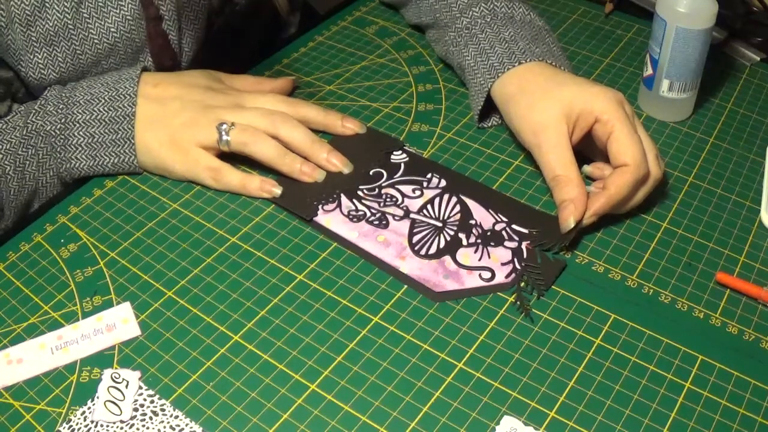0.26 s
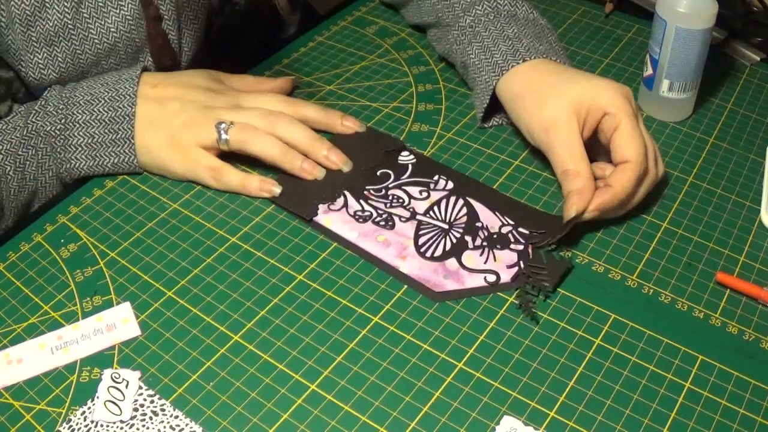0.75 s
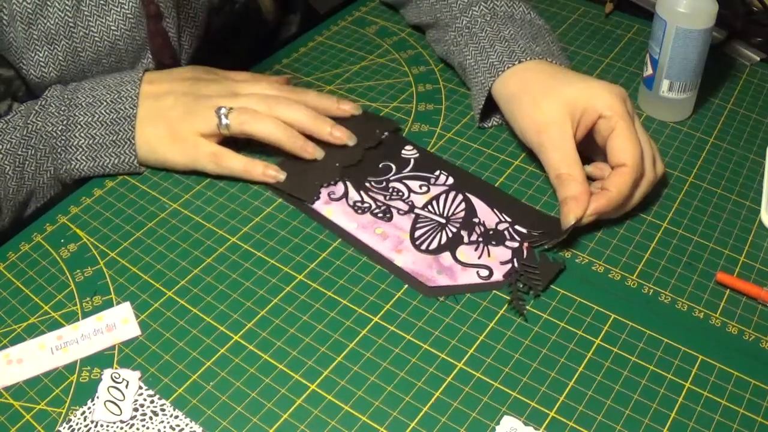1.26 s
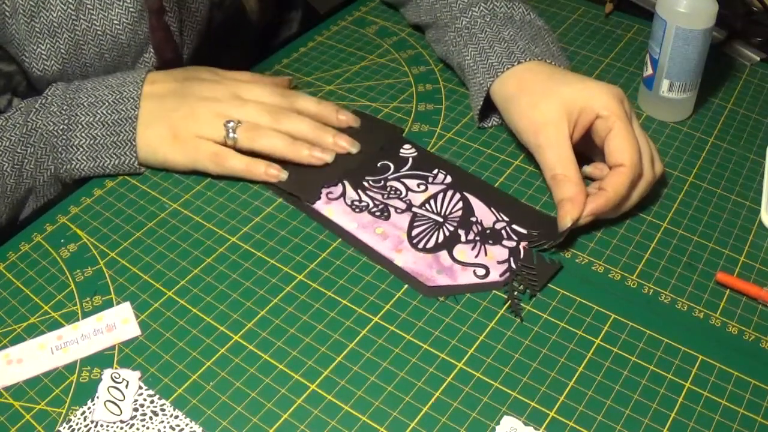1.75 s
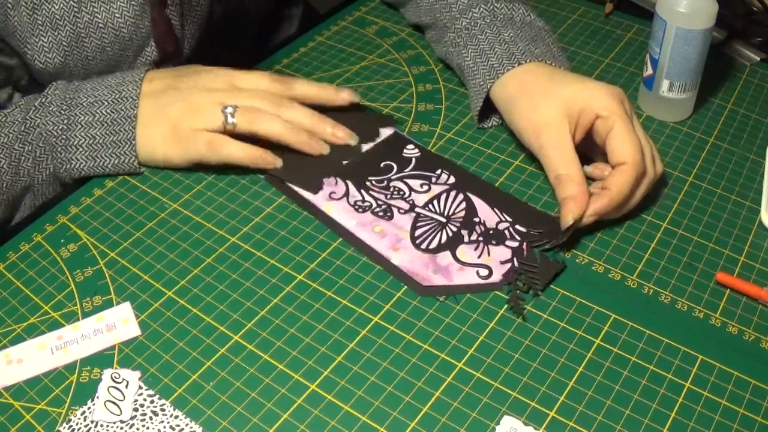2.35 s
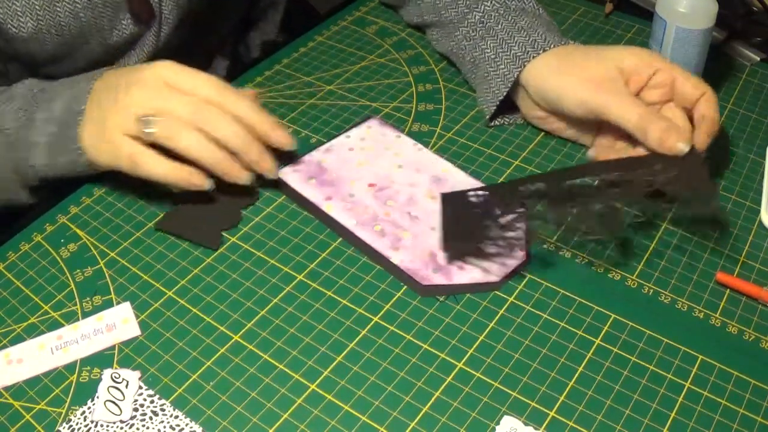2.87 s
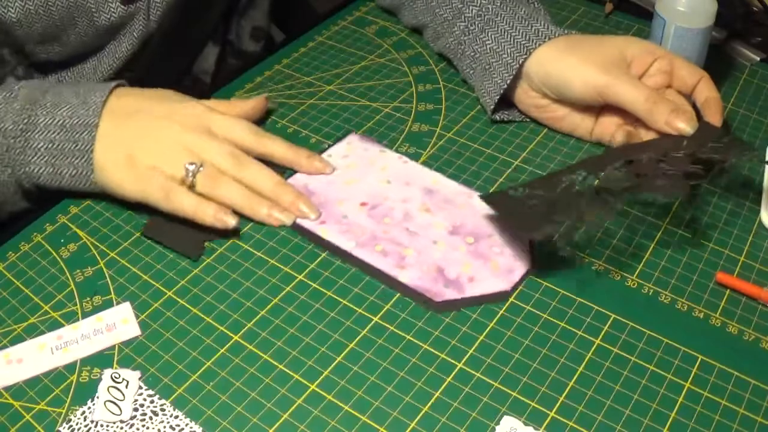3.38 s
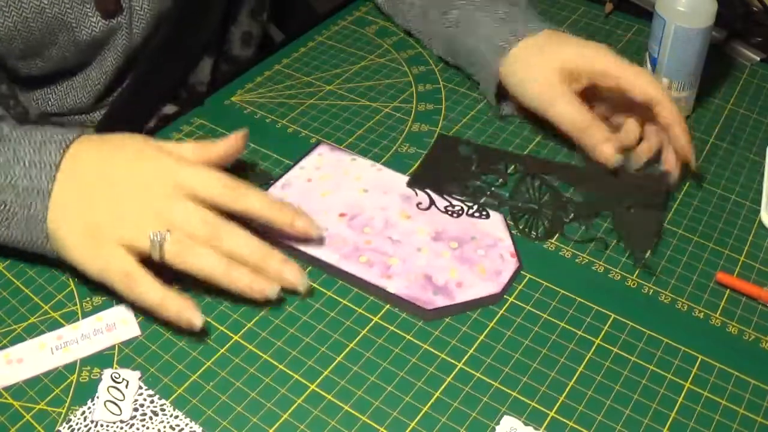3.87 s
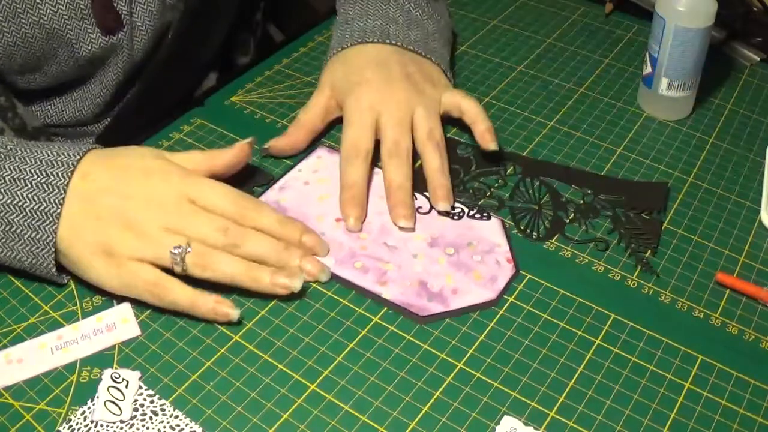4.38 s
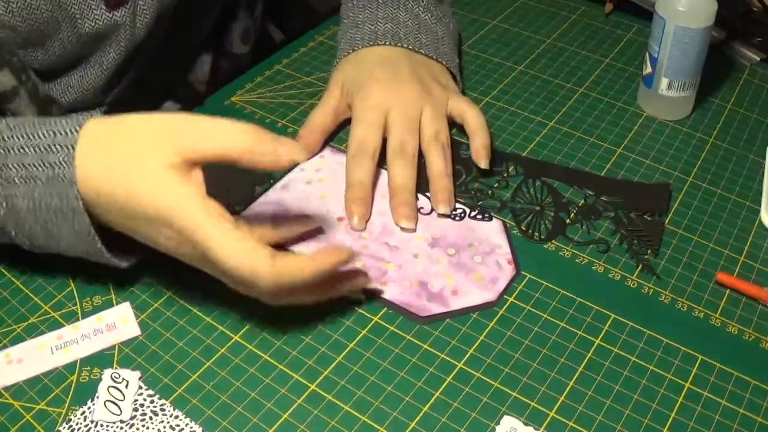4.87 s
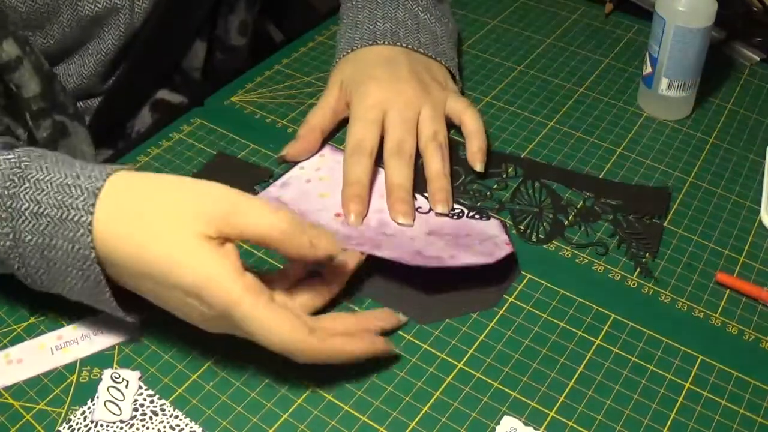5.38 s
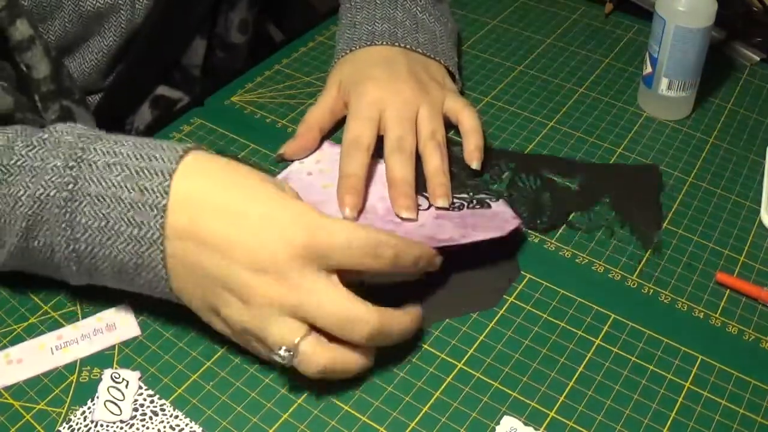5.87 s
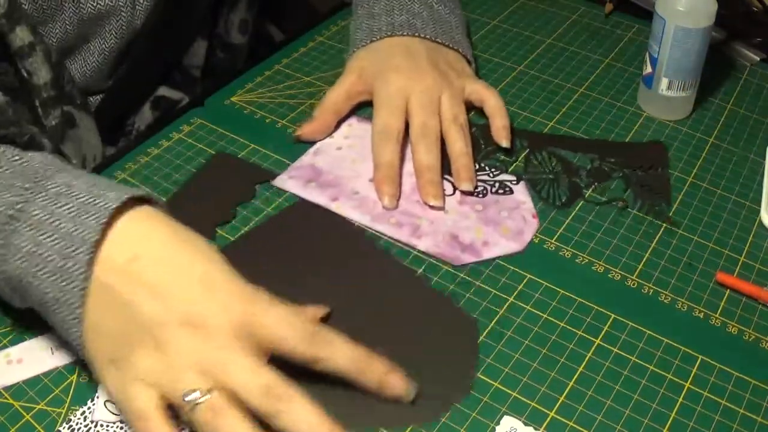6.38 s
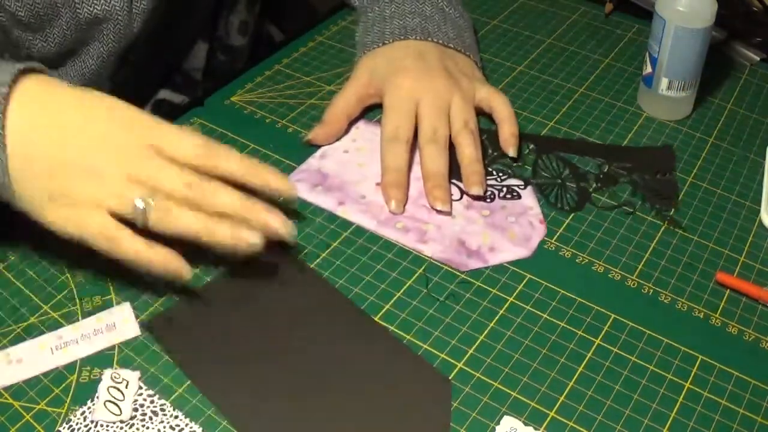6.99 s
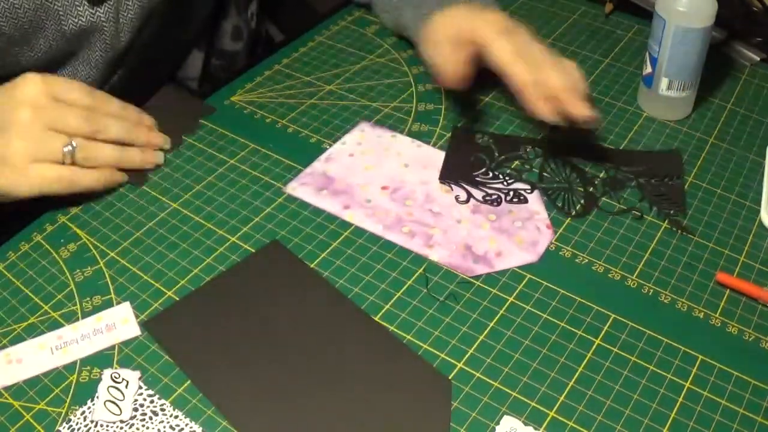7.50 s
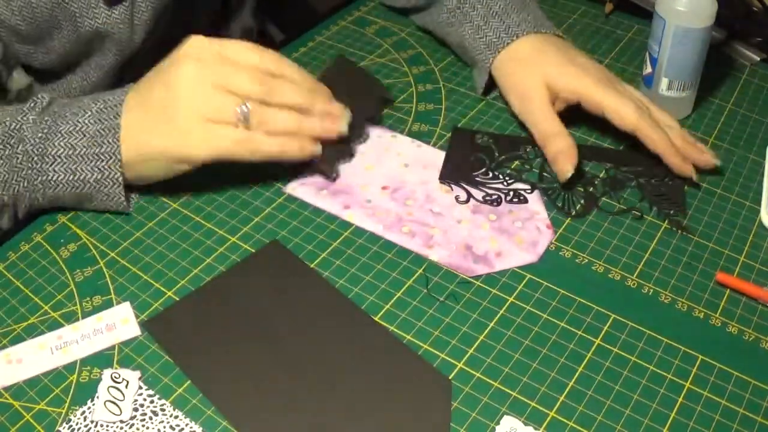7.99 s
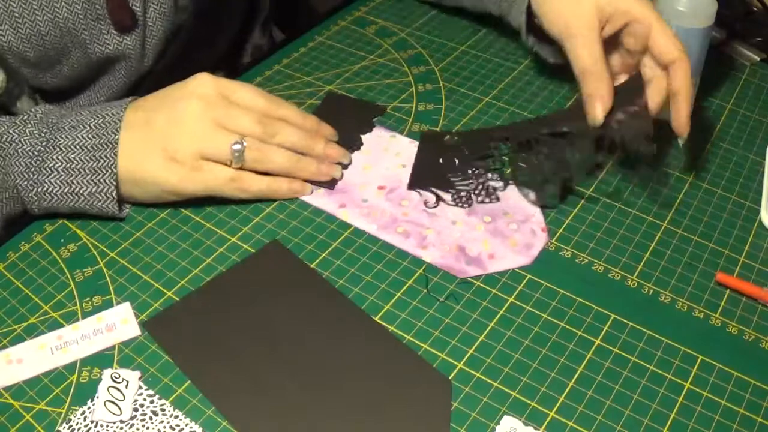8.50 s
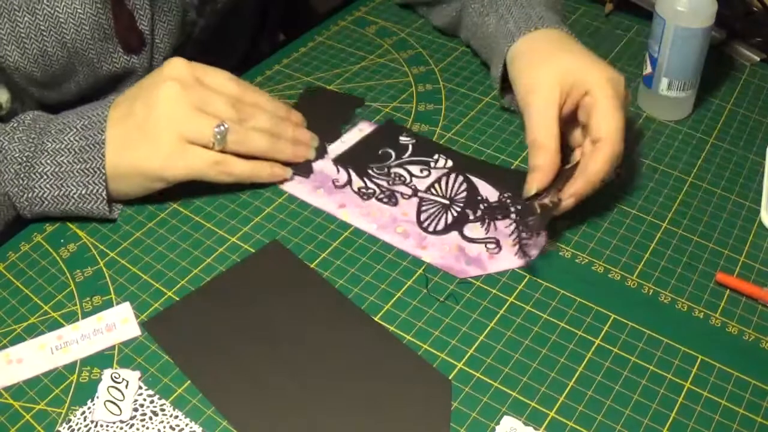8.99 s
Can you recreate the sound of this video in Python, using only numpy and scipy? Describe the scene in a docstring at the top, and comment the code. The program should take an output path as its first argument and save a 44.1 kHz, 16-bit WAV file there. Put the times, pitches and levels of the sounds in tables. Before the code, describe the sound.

Close to a small stereo camera in a quiet, faintly humming room, hands handle card on a cutting mat. Faint scuffs and a few crisp snaps come first, then a strong rustling drag as a lacy strip is pulled off with a wavering papery whine. Smaller scrapes follow, a louder slide near six seconds, and more shuffling, a hard snap and soft rustles to the end. A tiny mechanical tick runs underneath at times.

```python
"""Pieces of card and lacy cut paper are lifted, slid and laid down on a cutting mat, close to a small camera.
Sliding fibres hiss and catch: clumped random clicks over noise, coloured by the sheet and mirrored by the mat.
Card edges snap and fingernails tap as short noise bursts; the lacy strip sings as a wavering, gliding band.
Hand bumps ring low desk modes and a forearm rumbles over the top. Under it lie a quiet room of shaped noise
with mains hum, and a faint, regular ticking of struck modes, perhaps the camera's lens drive."""
import sys
import numpy as np
from scipy import signal
from scipy.fft import rfft, irfft
from scipy.io import wavfile
from scipy.ndimage import map_coordinates

SR = 44100
rng = np.random.default_rng(int(sys.argv[2]) if len(sys.argv) > 2 else 0)


def put_to_file(sound):
    """Save the sound as 16-bit audio at rate SR, in the file named by the first command-line argument."""
    columns = np.atleast_2d(sound).T  # one column per channel
    safe = np.clip(columns, -1, 1)
    whole_steps = np.round(safe * 32767)
    wavfile.write(sys.argv[1], SR, whole_steps.astype(np.int16))


N = 407925
TIME = np.arange(N) / SR  # s
FREQS = np.maximum(np.arange(N // 2 + 1) * SR / N, 1)  # Hz

# Levels of sources are relative, ahead of their trims, sheet ringing and the room.
# strokes of card over card or mat: (time at full speed [s], rise [s], hold [s], fade [s],
# flex [dB], rasp [dB], hiss [dB], ring of the free sheet [Hz], damped if below 100)
STROKES = [(0.594, 0.033, 0.023, 0.13, -75, -63.5, -56.5, 0),
           (0.706, .06, 0.017, 0.058, -80, -66, -59.5, 0), (0.845, 0.095, 0.022, 0.11, -70, -60, -57.5, 0),
           (1.02, 0.13, .04, 0.15, -73, -62, -55, 0), (1.166, 0.05, .1, 0.13, -71, -66.5, -61, 3350),
           (1.513, 0.041, 0.0077, 0.058, -79, -82, -67, 0),
           (1.642, 0.011, 0.059, 0.15, -65, -56.5, -53.5, 6400),
           (1.945, 0.049, 0.0082, 0.039, -71, -56.5, -49.5, 0), (2.15, 0.089, .01, 0.1, -85, -73, -63, 0),
           (2.29, 0.031, 0.023, 0.19, -64, -47.5, -42, 5350),
           (2.43, 0.087, 0.037, .2, -57, -46, -43.5, 5350),
           (2.559, 0.072, 0.14, 0.14, -60.5, -44.5, -42, 3500),
           (2.729, 0.057, 0.012, 0.11, -51, -50, -56, 4100),
           (3.069, 0.13, 0.0088, 0.17, -65, -63.5, -58, 0),
           (3.239, 0.046, 0.023, 0.086, -56.5, -44.5, -41.5, 0),
           (3.481, 0.14, 0.019, 0.17, -60, -49.5, -45.5, 0), (3.69, 0.089, 0.13, .1, -80, -66, -63, 0),
           (3.82, 0.034, .03, 0.44, -66.5, -55, -52.5, 0), (3.976, .2, 0.025, 0.48, -64.5, -64.5, -72, 0),
           (4.33, 0.18, 0.044, 0.033, -91, -71, -63, 0), (4.65, .05, .01, 0.062, -75, -61, -59, 0),
           (4.86, 0.12, 0.014, 0.039, -62.5, -63, -53, 0),
           (5.267, .02, 0.073, 0.088, -64, -60.5, -68, 2510), (5.436, .02, .03, 0.13, -67, -60, -58, 2510),
           (5.6, 0.11, .03, 0.088, -65, -58, -61, 2510),
           (5.687, 0.063, 0.014, 0.05, -57.5, -49.5, -45.5, 2510),
           (5.777, 0.011, 0.017, 0.081, -62, -38.5, -40.5, 3600),
           (5.825, 0.055, 0.015, 0.048, -49.5, -37.5, -39, 2300),
           (5.91, 0.049, 0.022, 0.17, -60.5, -51, -52, 0),
           (5.991, 0.011, 0.019, 0.12, -54.5, -43, -37.5, 1170),
           (6.096, .07, 0.042, 0.31, -59.5, -46.5, -38, 1170), (6.27, 0.11, .02, .3, -71, -57, -39.5, 8550),
           (6.445, 0.23, 0.17, 0.043, -60.5, -56.5, -42.5, 8555),
           (7.122, 0.016, .085, 0.066, -53.5, -46, -43, 3330),
           (7.24, 0.05, 0.054, 0.091, -57.5, -45, -58, 1820),
           (7.297, 0.044, 0.021, .2, -53.5, -48, -40, 3330),
           (7.443, 0.063, 0.031, 0.056, -49.5, -37.5, -38.5, 4070),
           (7.546, 0.019, 0.0085, 0.042, -57, -47, -45.5, 0),
           (7.626, 0.03, 0.0083, 0.053, -54, -48, -48.5, 0),
           (7.785, 0.083, 0.0088, 0.11, -62.5, -54.5, -47, 0), (7.9, 0.13, 0.15, .1, -67.5, -60, -58.5, 0),
           (8.058, .012, 0.037, 0.02, -50.5, -45.5, -41.5, 8900),
           (8.139, .005, 0.033, 0.053, -50.5, -41.5, -40.5, 5103),
           (8.213, 0.046, 0.02, 0.092, -60, -59, -51.5, 0),
           (8.27, .02, 0.041, 0.12, -61.5, -50, -44.5, 4060), (8.416, .05, 0.21, 0.39, -70, -63, -60.5, 0),
           (8.777, 0.018, 0.016, 0.086, -67, -53, -45.5, 0),
           (8.832, .04, 0.0083, 0.057, -59, -55, -59, 4060),
           (8.955, 0.08, .015, 0.088, -56, -48.5, -43.5, 4060), (9.22, .25, .03, .1, -69, -57.5, -55.5, 0)]
# held card never lies quite still: resting level of (flex [dB], rasp [dB], hiss [dB])
RESTING_DB = [-79.5, -80, -71]
# flex, rasp and hiss in turn: (low edge [Hz], high edge [Hz])
RANGES = [(560, 2200), (2200, 6500), (6700, 12500)]
# overall colour of rubbed card: (frequency [Hz], density [dB per Hz])
CARD = [(250, -20.5), (480, -17), (700, -11.5), (1000, -12), (1450, -12), (1800, -11.5), (2500, -8),
        (3600, -3), (5000, -4), (5800, -7.5), (7200, -4), (8700, 2.5), (9700, 2.5), (11000, -5)]
# resonances of card on the mat: (frequency [Hz], width [Hz], boost [dB])
CARD_PEAKS = [(684, 140, -2), (1196, 60, 2), (1810, 93, 3.5), (3450, 400, 2), (4160, 570, 2),
              (4930, 340, 1), (6370, 1200, 1), (7640, 510, 1.5), (8600, 600, 0.5)]
# snaps, taps and short scuffs of card: (time [s], flex [dB], rasp [dB], hiss [dB], length [s],
# ring of the free sheet [Hz], damped if below 100); levels are rms over 10 ms
SNAPS = [(0.3666, -65, -54.5, -51, 0.033, 0), (1.0763, -56.5, -47, -39.5, 0.011, 1450),
         (1.102, -72, -55, -52, .008, 0), (1.134, -63, -54, -48, .008, 0),
         (1.1534, -42.5, -34, -28.5, 0.0094, 1400), (1.2626, -64, -50, -50.5, .012, 0),
         (1.6478, -49.5, -36.5, -39.5, 0.012, 2998), (1.7989, -79, -57, -59, 0.0092, 0),
         (2.3804, -46.5, -47, -58, 0.03, 0), (2.5825, -70, -36, -39, 0.0096, 5353),
         (2.6585, -63, -47, -36.5, .015, -6), (2.733, -41.5, -39.5, -58, 0.015, 0),
         (3.8054, -75, -47, -45, 0.012, 0), (3.8842, -60, -53, -49, 0.0074, 0),
         (4.467, -66, -70, -56, 0.0091, 0), (4.493, -73, -56, -46, 0.043, 0),
         (4.506, -64, -49, -36, 0.012, 0), (4.5333, -64, -47.5, -45.5, .014, 0),
         (5.011, -78, -65, -54, .03, 0), (5.0197, -68, -50.5, -41.5, 0.015, 0),
         (5.055, -64, -54, -49.5, 0.011, 0), (5.179, -55, -66, -71, 0.022, 900),
         (5.249, -68, -57, -51.5, 0.009, 0), (5.371, -50.5, -50, -59, 0.05, 2510),
         (5.913, -62, -58, -33.5, 0.017, 0), (5.963, -52, -46.5, -39, 0.021, 0),
         (6.478, -65, -62, -33.5, .009, 8550), (6.5605, -59, -67, -32.5, 0.0042, 8550),
         (7.2195, -51, -51, -52, 0.034, 1822), (7.4816, -47, -36.5, -34, 0.023, 4070),
         (8.0464, -51, -44.5, -34, 0.013, 0), (8.0926, -36.5, -25, -33, .017, 700),
         (8.0973, -45, -33, -41, 0.0089, 5100), (8.413, -57, -52, -50, 0.025, 0),
         (8.441, -50.5, -48.5, -47, 0.036, 2900), (8.547, -73, -53.5, -52.5, .014, 4),
         (8.793, -58, -55, -38, 0.0094, 7)]
# the lacy strip sings as it is dragged off the card: (time [s], level [dB])
SING = [(2.25, -85), (2.33, -56.5), (2.45, -58), (2.62, -52.5), (2.76, -60), (2.84, -67), (3.15, -70.5),
        (3.35, -83)]
# pitch of that singing: (time [s], frequency [Hz])
SING_HZ = [(2.3, 1980), (2.5, 1900), (2.65, 1760), (2.85, 2060), (3.2, 2080)]
# where the handled card lies: (time [s], left minus right [dB])
PLACE = [(0, -2), (2.7, -1.5), (5.8, -2.2), (6.6, -2), (7.15, 0), (7.5, 0), (8.2, -2.8), (8.8, -2.5)]
# left-right colour of card and ticking: (frequency [Hz], left minus right [dB])
CARD_BALANCE = [(400, -6), (1100, -0.5), (2000, -0.6), (5000, 1.5), (9000, 1.7)]
# soft bumps of a hand on the desk: (time [s], level [dB])
BUMPS = [(3.103, -38), (3.122, -45), (6.966, -48), (8.082, -43), (8.094, -50)]
# desk modes: (frequency [Hz], level [dB], t60 [s])
DESK = [(115, -20, 0.063), (157, -2, 0.058), (207, 0.5, 0.056), (297, -10, 0.044)]
# a forearm shifts on the desk: (time of the middle [s], length [s], level [dB])
ARM_SHIFTS = [(2.794, 0.66, -61), (3.953, 0.37, -60.5), (4.873, 0.35, -62.5), (6.55, 0.98, -59.5),
              (7.597, 0.55, -60.5), (8.2, 0.74, -59), (8.95, .7, -63.5)]
# spells of regular ticking: (start [s], end [s], level [dB])
TICKING = [(2.904, 3.2, -51), (4.105, 7.1, -52.5), (7.703, 9.2, -49.5)]
# single small pings: (time [s], level [dB])
PINGS = [(.935, -37), (.995, -35), (2.835, -38), (2.864, -48), (4.648, -44)]
# modes of ticks and pings: (frequency [Hz], level [dB], t60 [s])
TICK_MODES = [(2960, -9, 0.035), (3350, -6, 0.012), (3300, -11, 0.017)]
# colour of the room noise: (frequency [Hz], density [dB per Hz])
ROOM = [(20, -20), (36, -12), (55, -10), (80, -4), (150, -6.5), (185, -7.5), (247, -4), (400, -11),
        (505, -13.5), (1000, -15.5), (1850, -18), (2900, -22), (6000, -26), (11000, -32)]
# left-right likeness of the room noise: (frequency [Hz], likeness [0-1])
LIKENESS = [(50, 1), (130, 0.9), (260, 0.91), (500, 0.4), (1000, 0.1), (3000, 0.2), (9000, 0.64)]
# hum: (frequency [Hz], rms level [dB], waver [rad of phase; half of it as share of level])
HUM = [(50, -65.5, .18), (150, -69, .35), (246, -66, .75), (404, -74, .4), (851, -85, 1.3)]


def from_db(db):
    """Decibels to gain."""
    return 10 ** (np.asarray(db) / 20)


def rms_one(x):
    """Scale to unit rms."""
    return x / np.sqrt(np.mean(x ** 2) + 1e-20)


def in_time(rows):
    """Each column of a curve, at every sample."""
    s, *columns = np.transpose(rows)
    return [np.interp(TIME, s, column) for column in columns]


def by_frequency(points):
    """A curve over log frequency, at every bin."""
    hz, value = np.transpose(points)
    return np.interp(np.log(FREQS), np.log(hz), value)


def drift(rate):
    """Random wander of unit rms: straight lines between `rate` random points per second."""
    knots = rng.standard_normal(int(N / SR * rate) + 4)
    return rms_one(np.interp(TIME * rate, np.arange(len(knots)), knots))


def causal(gain):
    """Short minimum-phase impulse response with the given gain per bin."""
    cepstrum = irfft(np.log(gain + 1e-5), N)[:4096]
    cepstrum[1:] *= 2  # fold the cepstrum to make it causal
    return irfft(np.exp(rfft(cepstrum)))[:1024]


def convolve(x, response):
    """Pass a sound through an impulse response."""
    return signal.oaconvolve(x, response)[:N]


def sliding(responses, judder_db=0.8, patchy_db=1.06, ring_db=0.0):
    """Each stroke drives the sheet with friction; the grip judders in all ranges at once."""
    grip = judder_db * drift(170)
    rub = friction(catches_per_s=1800, size_db=2.0, smooth_share=0.5) + crackles()
    ranges = []
    for response in responses:
        uneven_db = grip + patchy_db * drift(90)
        ranges.append(convolve(rub * from_db(uneven_db), response))
    ranges = np.array(ranges)
    out = from_db(RESTING_DB) @ ranges
    for s, rise, hold, fade, *levels, hz in STROKES:
        span = slice(max(int((s - 2 * rise) * SR), 0), int((s + hold + 2 * fade) * SR))
        swell = from_db(stroke_db(TIME[span] - s, rise, hold, fade))
        stroke = from_db(levels) @ ranges[:, span] * swell
        out[span] += free_sheet(stroke, hz, ring_db)
    return out


def friction(catches_per_s, size_db, smooth_share, clump_db=2.5):
    """Fibres catch and let go in random clumps, over a smooth rub."""
    sizes = from_db(size_db * np.minimum(rng.exponential(1, N), 4)) * rng.choice([-1, 1], N)
    chance = catches_per_s * from_db(clump_db * drift(250)) / SR
    catches = rms_one(sizes * (rng.random(N) < chance))
    share = np.clip(smooth_share, 0, 1)
    return np.sqrt(1 - share) * catches + np.sqrt(share) * rng.standard_normal(N)


def crackles(per_s=11):
    """Now and then a whole bundle of fibres lets go with a tiny click."""
    return (rng.random(N) < per_s / SR) * rng.uniform(8, 20, N)


def stroke_db(t, rise, hold, fade, span_db=20, jerk_db=3, sudden_s=0.026, settle_s=0.01, bend=1.03):
    """Speed up, hold, slow down; the more sudden the start, the harder the card jerks loose."""
    ramp = np.maximum(-t / rise, 0) + np.maximum((t - hold) / fade, 0)
    jerk = jerk_db * np.exp(-rise / sudden_s - np.abs(t) / settle_s)
    return jerk - span_db * ramp ** bend  # rise and fade each span span_db


def card_responses():
    """The sheet's body colours flex, rasp and hiss: one impulse response of unit energy for each."""
    colour_db = by_frequency(CARD)
    for hz, width, db in CARD_PEAKS:
        colour_db = colour_db + db / (1 + (2 * (FREQS - hz) / width) ** 2)
    responses = []
    for (low, high), order in zip(RANGES, (6, 12, 14)):  # steeper low skirts for higher ranges
        band = 1 / np.sqrt((1 + (low / FREQS) ** order) * (1 + (FREQS / high) ** 14))
        response = causal(band * from_db(colour_db - colour_db.max()))
        responses.append(response / np.linalg.norm(response))
    return responses


def free_sheet(x, hz, ring_db, width_hz=330):
    """The part of a sheet that the hand leaves free rings at one pitch."""
    if hz < 100:  # damped
        return x
    ringing = signal.lfilter(*signal.iirpeak(hz, hz / width_hz, fs=SR), x)
    return x + from_db(ring_db) * ringing


def mat_echo(x, mirrored=0.3, delay_s=.0016, wander=0.163):
    """The mat mirrors a moving sheet: a wandering delay makes a shifting ripple of peaks and dips."""
    late = np.arange(N) - SR * delay_s * np.exp(wander * drift(6))
    return (x + mirrored * map_coordinates(x, [late], order=3)) / np.hypot(1, mirrored)


def snapping(responses, trim_db=-2.5, ring_db=4.5):
    """An edge lets go: one crack, and a burst of tiny impacts that decays 30 dB over its length."""
    out, t = np.zeros(N), TIME[:SR // 8]
    for s, *levels, length, hz in SNAPS:
        rise = length ** 2 / .17  # long scuffs swell softly
        envelope = (1 - np.exp(-t / rise)) * from_db(-30 * t / length)
        impacts = envelope * rng.standard_normal(len(t))
        impacts /= np.linalg.norm(impacts)
        impacts[SR // 1500] += 2 * np.exp(-length / .01)  # the crack, weaker in long scuffs
        snap = np.zeros(len(t))
        for db, response in zip(levels, responses):
            burst = signal.fftconvolve(impacts, response)[:len(t)]
            burst /= np.linalg.norm(burst)
            snap += from_db(db + trim_db) * np.sqrt(SR / 100) * burst  # level as rms over 10 ms
        start = int(s * SR)
        out[start:start + len(t)] += free_sheet(snap, hz, ring_db)
    return out


def singing(flutter_db=3.3, rough_above_db=-68):
    """A resonance shifts with the free length of the strip: rough while dragged hard, thin as it dies."""
    level_db = in_time(SING)[0]
    phase = 2 * np.pi * np.cumsum(in_time(SING_HZ)[0]) / SR
    rough = drift(450) * np.cos(phase) + drift(450) * np.sin(phase)  # wide band
    thin = drift(90) * np.cos(phase) + drift(90) * np.sin(phase)  # narrow band
    fluttering = rough * from_db(flutter_db * drift(70))
    share = 1 / (1 + from_db(4 * (rough_above_db - level_db)))
    band = np.sqrt(share) * fluttering + np.sqrt(1 - share) * thin
    return from_db(level_db) * rms_one(band)


def strike(hits, modes, vary_db):
    """Each hit rings all modes as decaying sines, with strengths of its own."""
    out, rows = np.zeros(N), np.array(hits)
    for hz, db, t60 in modes:
        clicks = np.zeros(N)
        strengths_db = rows[:, 1] + db + vary_db * rng.standard_normal(len(rows))
        clicks[(rows[:, 0] * SR).astype(int)] = from_db(strengths_db)
        r, w = from_db(-60 / (t60 * SR)), 2 * np.pi * hz / SR  # decay and turn per sample
        out += signal.lfilter([0, np.sin(w)], [1, -2 * r * np.cos(w), r * r], clicks + 1e-18)
    return out


def bumping(low_hz=105, soft_hz=360):
    """The soft hand leaves only the low modes of the desk."""
    soften = signal.butter(2, [low_hz, soft_hz], "band", fs=SR, output="sos")
    return signal.sosfilt(soften, strike(BUMPS, DESK, vary_db=4.0))


def forearm(low_hz=70, high_hz=340):
    """Sleeve and wrist drag dully over the desk top; each shift swells and dies evenly."""
    dull = signal.butter(2, [low_hz, high_hz], "band", fs=SR, output="sos")
    rumble = signal.sosfilt(dull, rng.standard_normal(N))
    power = sum(from_db(db) ** 2 * np.exp(-(2 * (TIME - s) / length) ** 2) for s, length, db in ARM_SHIFTS)
    return np.sqrt(power) * rms_one(rumble)


def ticking(period_s=.04, weak_db=-7, thin_hz=2000):
    """Strong and weak ticks alternate; a few louder pings stand alone. The ticks carry no bass."""
    ticks = []
    for start, end, db in TICKING:
        for k, s in enumerate(np.arange(start, end, period_s)):
            ticks.append((s, db + weak_db * (k % 2)))
    ringing = strike(ticks + PINGS, TICK_MODES, vary_db=3.0)
    return signal.sosfilt(signal.butter(3, thin_hz, "high", fs=SR, output="sos"), ringing)


def background(noise_db=-58):
    """Steady room noise, alike on both sides in the bass, and a wavering hum."""
    mid, side = rfft(rng.standard_normal((2, N)))
    alike = np.clip(by_frequency(LIKENESS), 0, 1)
    pair = np.sqrt(1 + alike) * mid + np.sqrt(1 - alike) * side * [[1], [-1]]
    noise = rms_one(irfft(pair * from_db(by_frequency(ROOM)), N))
    hum = np.zeros(N)
    for hz, db, waver in HUM:
        tone = np.sin(2 * np.pi * hz * TIME + waver * drift(14))
        hum += from_db(db) * rms_one(tone * (1 + waver / 2 * drift(14)))
    return from_db(noise_db) * noise + hum


def room(x, early_db=-12, early_t60=0.032, tail_db=-13.5, tail_t60=0.19):
    """Direct sound, scatter from the desk and a short tail, different at each microphone."""
    t, sides = TIME[:SR // 2], []
    for sign in (1, -1):  # left, right
        response = np.zeros(len(t))
        for db, t60, delay in ((early_db, early_t60, .001), (tail_db, tail_t60, .007)):
            echoes = rng.standard_normal(len(t)) * from_db(-60 * t / t60) * (t > delay)
            response += from_db(db) * echoes / np.linalg.norm(echoes)
        response[0] = 1  # direct sound
        balance = causal(from_db(sign * by_frequency(CARD_BALANCE) / 2))
        sides.append(convolve(convolve(x, response), balance))
    return np.array(sides)


def scene():
    """Card, desk and ticking in the room."""
    responses = card_responses()
    card = from_db(-3.5) * mat_echo(sliding(responses)) + snapping(responses) + singing()
    pan = from_db(in_time(PLACE)[0] / 2 * [[1], [-1]])
    desk = bumping() + forearm()  # deep sounds reach both microphones alike
    return pan * room(card) + room(ticking()) + desk + background()


def record(dry, cutoff_hz=11080):
    """The camera cuts the top steeply: an elliptic low-pass."""
    return signal.sosfilt(signal.ellip(12, .2, 80, cutoff_hz, fs=SR, output="sos"), dry)


dry = scene()
out = record(dry)
put_to_file(out)
```